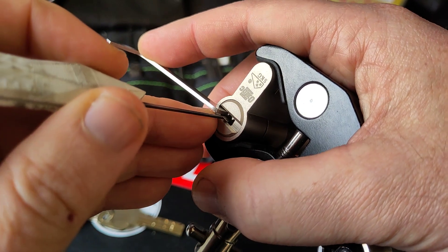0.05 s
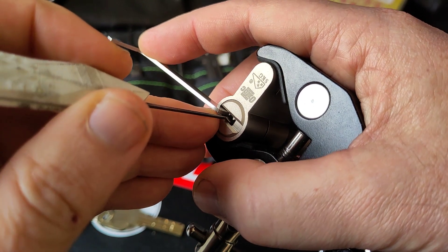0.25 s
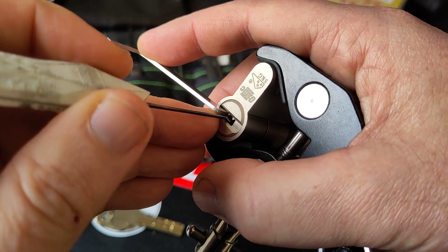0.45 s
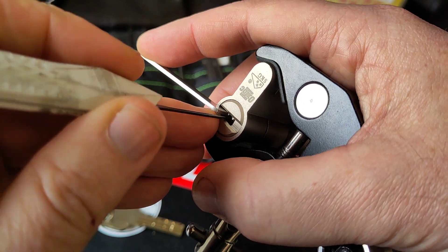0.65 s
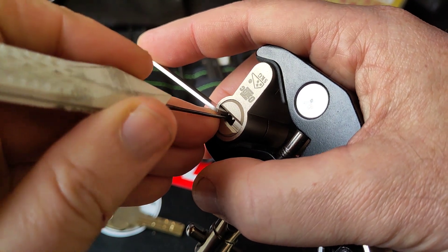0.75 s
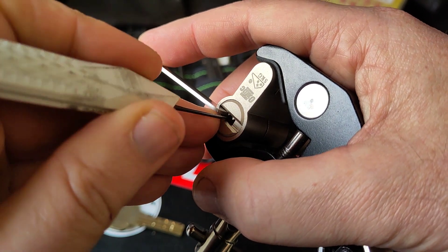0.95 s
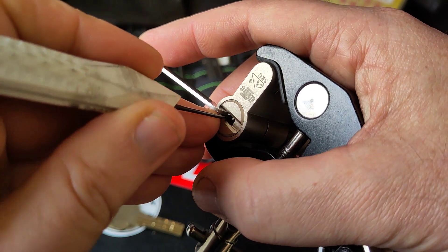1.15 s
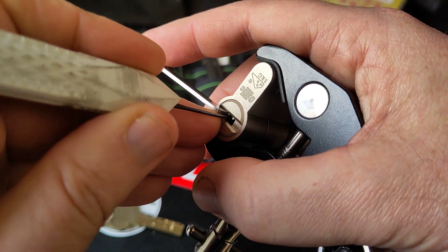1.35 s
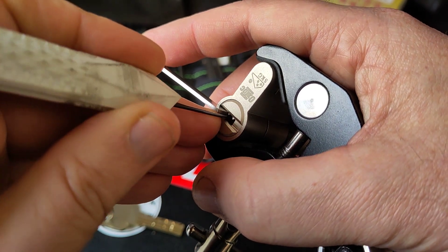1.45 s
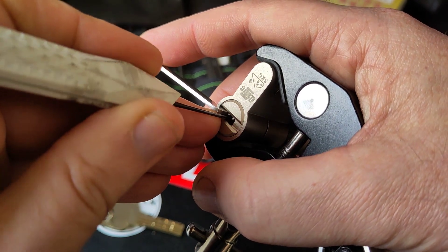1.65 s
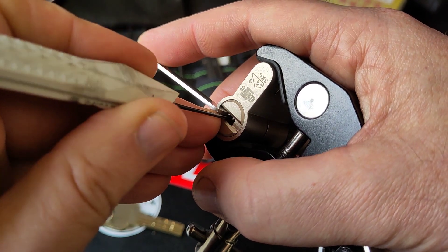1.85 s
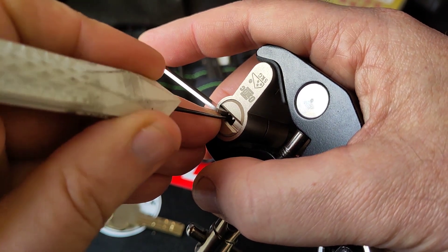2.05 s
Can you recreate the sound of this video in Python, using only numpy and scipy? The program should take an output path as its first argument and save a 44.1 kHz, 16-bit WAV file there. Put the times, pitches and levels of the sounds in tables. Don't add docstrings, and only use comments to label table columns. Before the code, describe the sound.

Lock picking, close and dry: a faint tick at 0.1 seconds, crisp small clicks at 0.37, 0.65 and 0.83 with thin scrapes between. At 0.98 a pin sets with a loud bright snap, quick bounces and a low table thump. Lighter ticks follow at 1.34, 1.49, 1.57 and 1.72, two with soft thumps. Hiss, low hand rumble, air sway and a faint left-side fan continue; short room tail.

```python
import sys
import numpy as np
from scipy import signal
from scipy.fft import rfft, irfft
from scipy.io import wavfile
from scipy.ndimage import uniform_filter1d

SR = 44100
rng = np.random.default_rng(int(sys.argv[2]) if len(sys.argv) > 2 else 0)


def dump_mix(stems):
    frames = np.atleast_2d(stems).T
    limited = np.clip(frames, -1, 1)
    pcm = np.round(limited * 32767).astype(np.int16)
    wavfile.write(sys.argv[1], SR, pcm)


def voltage_ratio(decibels):
    exponent = np.asarray(decibels, float) / 20
    return 10 ** exponent


N = 92610
HISS_TOP_HZ = 15650

# start_s, sway_db, rumble_db
AIR_AND_HANDS = [(0.0, -78, 6), (0.439, -39, -2), (0.51, -51, 3.5), (0.62, -36, 5), (0.83, -45, 6),
                 (0.89, -64.5, 3.5), (1.09, -37.5, 5.5), (1.232, -33.5, 3), (1.32, -61, 2),
                 (1.81, -40.5, 1), (2.04, -76, 2), (2.1, -54, 2)]


def ring(x, hz, t60):
    pole = np.exp(2j * np.pi * hz / SR - np.log(1000) / (t60 * SR))
    return signal.lfilter([1], [1, -pole], x).imag


def late(x, s):
    k = int(s * SR)
    return np.concatenate([np.zeros(k), x[:N - k]])


def walk(rate):
    k = int(SR / rate)
    steps = np.repeat(rng.standard_normal(N // k + 1), k)
    return 1.11 * uniform_filter1d(uniform_filter1d(steps, k), k)[:N]


def follow(start_s, level_db):
    return voltage_ratio(np.interp(np.arange(N) / SR, start_s, level_db))


def noise(spectrum):
    flicker_db = 1.1
    patch_db, patch_hz, patch_per_s, patch_full_hz = 4.0, 350, 20, 6500
    f = np.arange(N // 2 + 1) * SR / N + .1
    hz, db = np.array(spectrum, float).T
    level = voltage_ratio(np.interp(np.log(f), np.log(hz), db))
    x = rfft(rng.standard_normal(N)) * level * np.sqrt(SR / 2)
    x = x * (f > hz[0] / 2) * (f < HISS_TOP_HZ)
    strip = np.maximum(f // patch_hz - 1, 0)
    out = irfft(x * (strip == 0), N) * voltage_ratio(flicker_db * walk(11))
    top = 1.05 * hz[-1]
    x[f > top] = 0
    for k in range(1, int(top // patch_hz) + 1):
        depth_db = patch_db * min(k * patch_hz / patch_full_hz, 1)
        out += irfft(x * (strip == k), N) * voltage_ratio(depth_db * walk(patch_per_s))
    return out


def sway():
    sway_hz, side_db = 4.4, -14.5
    start_s, sway_db, _ = np.array(AIR_AND_HANDS).T
    cycles = np.cumsum(sway_hz * (1 + 0.162 * walk(3.75))) / SR
    mid = np.sqrt(2) * np.sin(2 * np.pi * cycles)
    side = voltage_ratio(side_db) * np.array([[1], [-1]]) * walk(11.24)
    return follow(start_s, sway_db) * (mid + side)


def rumble():
    # pitch_hz, level_db (per Hz)
    spectrum = [(8, -82.5), (20, -72.5), (40, -86), (80, -91.5), (160, -95), (300, -100), (600, -110),
                (1500, -125)]
    start_s, _, rumble_db = np.array(AIR_AND_HANDS).T
    return noise(spectrum) * follow(start_s, rumble_db)


def hiss():
    # pitch_hz, level_db (per Hz)
    left = [(8, -67.5), (40, -77), (150, -93.5), (500, -103), (1200, -103), (3500, -110), (9000, -116),
            (15000, -111)]
    # pitch_hz, level_db (per Hz)
    right = [(8, -68.5), (40, -96.5), (150, -92), (500, -103), (1500, -106), (5000, -111), (10000, -117),
             (15000, -111)]
    return np.array([noise(left), noise(right)])


def fan():
    fan_hz, width_hz, level_db = 1937, 930, -70
    t60 = 2.4 / width_hz
    x = ring(ring(rng.standard_normal(N), fan_hz, t60), fan_hz, t60)
    return x / x.std() * voltage_ratio(level_db + 1.4 * walk(3.65)) * voltage_ratio(np.array([[0], [-14]]))


def stir():
    # start_s, level_db
    swell = [(0, 2.5), (.12, 0), (.34, -1), (0.421, 2.5), (.62, 1), (.75, 3), (.9, 1.5), (1.04, 2),
             (1.3, 0.5), (1.5, -1), (1.6, -1.5), (1.72, 1.5), (2.1, -0.5)]
    return follow(*np.array(swell).T)


def room(x):
    gap_s, t60_s = 0.00062, .23
    tail_db = [-15.5, -24.5]
    t = np.arange(SR // 3) / SR
    fade = np.exp(-np.log(1000) * t / t60_s) * np.clip(t / gap_s, 0, 1)
    tail = rng.standard_normal((2, len(t))) * fade
    tail = tail / np.sqrt((tail ** 2).sum(axis=1, keepdims=True))
    tail = tail * voltage_ratio(np.array(tail_db))[:, None]
    return signal.fftconvolve(x, tail, axes=1)[:, :N]


def table_top():
    push_s, right_db, right_lag_s = 0.0012, -3.0, .0003
    # start_s, level_db
    thumps = [
        (.9794, -42),
        (1.730, -62),
        (1.489, -57),
    ]
    # pitch_hz, level_db, t60_s
    modes = [(53.6, -3.5, 0.21), (107, -6.5, 0.049), (170.3, -2.5, 0.19), (236.5, 0.5, 0.17),
             (280.7, -8, 0.16), (365, -7.5, 0.1), (460, -11, 0.049), (566, -4, 0.038), (735, -3.5, 0.023),
             (866, 2, 0.03), (1060, 0.5, 0.029)]
    x = np.zeros(N)
    for start_s, db in thumps:
        x[int(start_s * SR)] = voltage_ratio(db)
    push = np.hanning(int(push_s * SR) + 3)
    x = np.convolve(x, push / push.sum())[:N]
    thump = sum((-1) ** k * voltage_ratio(db) * ring(x, hz, t60) for k, (hz, db, t60) in enumerate(modes))
    return np.array([thump, voltage_ratio(right_db) * late(thump, right_lag_s)])


def brief_tones():
    rise_s = .0004
    # start_s, pitch_hz, left_db, right_db
    short_tones = [(.3652, 4000, -53, -48), (.3655, 7000, -70, -51), (.3668, 6000, -62, -52),
                   (.3665, 9100, -43, -58), (.3662, 14800, -60, -54), (.3735, 10000, -56, -75),
                   (.6472, 2900, -59, -64), (.6474, 5500, -62, -59), (.8282, 5500, -54, -59),
                   (.8280, 7000, -51, -52), (.9705, 7000, -58, -50), (.9740, 7200, -56, -48),
                   (.9805, 5000, -50, -44), (.9797, 14800, -50, -40), (.9825, 13000, -50, -46),
                   (.9880, 7300, -60, -50), (1.0010, 5500, -72, -52), (1.0012, 7200, -72, -53),
                   (1.0008, 14500, -62, -50), (.3660, 3200, -57, -56), (.8335, 5000, -59, -62),
                   (1.4900, 900, -52, -56), (.9800, 1400, -44, -54), (.9803, 2500, -45, -52),
                   (.9798, 3600, -41, -50), (.9800, 5800, -43, -46), (.9797, 16000, -34, -44),
                   (.6472, 16000, -50, -58), (1.4893, 2500, -60, -66)]
    out, u = np.zeros((2, N)), np.arange(SR // 100) / SR
    swell = u / rise_s * np.exp(1 - u / rise_s)
    for start_s, hz, left_db, right_db in short_tones:
        tone = swell * np.sin(2 * np.pi * (hz * u + rng.random((2, 1))))
        k = int((start_s - rise_s) * SR)
        out[:, k:k + len(u)] += voltage_ratio(np.array([[left_db], [right_db]])) * tone
    return out


def slide():
    # start_s, length_s, level_db
    scrapes = [(.004, 0.01, -64.5), (0.067, 0.03, -76), (0.363, 0.016, -66), (0.672, 0.058, -73.5),
               (.8235, .040, -62), (.968, .010, -56), (0.939, 0.051, -70), (0.988, 0.0071, -62.5)]
    t = np.arange(N) / SR
    return sum(voltage_ratio(db) * np.sin(np.pi * np.clip((t - s) / d, 0, 1) ** 0.65) for s, d, db in scrapes)


def highpass(x, hz):
    return signal.sosfilt(signal.butter(2, hz, "high", fs=SR, output="sos"), x)


def lock():
    grit_per_s, grit_scatter_db = 3000, 2.5
    mode_scatter_db, right_lag_s = 2.0, .0004
    body_low_hz, skirt = 700, 1.12
    crack_db, crack_room_db, crack_low_hz = -3.5, 1, 4500
    # start_s, low_db, middle_db, high_db, body_db
    pin_ticks = [(.1020, -58, -66, -70, -78), (.3651, -58, -42, -46, -56), (.3661, -58, -45, -46, -57),
                 (.3690, -64, -53, -58, -68), (.6470, -37, -54, -33, -56), (.6490, -56, -62, -56, -66),
                 (.6955, -55, -66, -70, -80), (.7635, -56, -62, -70, -78), (.8250, -48, -54, -68, -74),
                 (.8279, -39, -46, -66, -64), (.8311, -49, -54, -68, -74), (.9726, -36, -43, -58, -64),
                 (.9785, -38, -30, -36, -52), (.9790, -28, -13.5, -27, -33), (.9801, -35, -26, -33, -44),
                 (.9822, -48, -44, -42, -46), (1.0005, -52, -50, -52, -70), (1.3370, -40, -47, -54, -62),
                 (1.3401, -58, -62, -64, -76), (1.4891, -50, -55, -56, -55), (1.5680, -59, -66, -68, -72),
                 (1.7226, -50, -46, -58, -59)]
    # pitch_hz, level_db, t60_s
    clusters = [
        [(7300, -12, .007), (7950, -8, .008), (8600, 0, .006), (9200, -5, .005)],
        [(10300, -2, .0035), (11100, -2, .0035), (11800, 0, .0045), (12600, -6, .0035)],
        [(13600, -6, .005), (14600, 0, .006), (15500, -3, .004)],
        [(1400, -1, .0022), (2100, 0, .002), (2900, 0, .002), (3800, 1, .002), (4900, -4, .002),
         (6000, 0, .0022)],
    ]
    # low_db, middle_db, high_db, body_db
    scrape_colour = [0, -4, -14, -13]
    # pitch_hz, level_db
    shadow = [(1500, -7), (3800, -7), (5000, -2), (7300, -1), (8100, -17), (10500, -19), (12000, -27),
              (15000, -14)]
    # low_db, middle_db, high_db, body_db
    spill_db = [
        [-2, -6, -2.2, -2.5],
        [-1, -8, 0, 4],
    ]

    ticks = np.array(pin_ticks)
    at = (ticks[:, 0] * SR).astype(int)
    scatter_db = mode_scatter_db * rng.standard_normal((len(ticks), 2, 17))
    shadow_hz, shadow_db = np.array(shadow).T
    stroke = slide()
    near, spill, k = 0, 0, 0
    for c, cluster in enumerate(clusters):
        part = np.zeros((2, N))
        for hz, db, t60 in cluster:
            grit = rng.random(N) < grit_per_s / SR
            grit = grit * voltage_ratio(grit_scatter_db * rng.exponential(size=N))
            for side in range(2):
                x = grit * stroke * voltage_ratio(scrape_colour[c])
                np.add.at(x, at, voltage_ratio(ticks[:, 1 + c] + scatter_db[:, side, k]))
                shade_db = side * np.interp(np.log(hz), np.log(shadow_hz), shadow_db)
                part[side] += (-1) ** k * voltage_ratio(db + shade_db) * ring(x, hz, t60)
            k += 1
        low_hz = body_low_hz if c == 3 else cluster[0][0] / skirt
        band = [low_hz, cluster[-1][0] * skirt]
        part = signal.sosfilt(signal.butter(2, band, "band", fs=SR, output="sos"), part)
        near = near + part
        spill = spill + voltage_ratio(np.array(spill_db)[:, c, None]) * (part[0] + 2 * part[1])
    crack = np.zeros(N)
    crack[at] = voltage_ratio(ticks[:, 1:4].max(axis=1))
    crack = highpass(crack, crack_low_hz)
    near[0] += voltage_ratio(crack_db) * crack
    spill = spill + voltage_ratio(crack_room_db) * crack
    return np.array([near[0], late(near[1], right_lag_s)]), spill


def scene():
    floor = rumble() + (hiss() + fan()) * stir() + sway()
    near, spill = lock()
    return near + brief_tones() + table_top() + room(spill) + floor


def top_cut(x):
    return signal.sosfilt(signal.butter(12, 16830, fs=SR, output="sos"), x)


def record(dry):
    shelf_db, top_hz = -14, 16650
    f = np.arange(N // 2 + 1) * SR / N
    corner_hz = [HISS_TOP_HZ - 100, HISS_TOP_HZ + 100, top_hz, top_hz + 150]
    top_db = np.interp(f, corner_hz, [0, shelf_db, shelf_db, -80])
    mix = irfft(rfft(dry, axis=1) * voltage_ratio(top_db), N, axis=1)
    return top_cut(mix)


dry = scene()
out = record(dry)
dump_mix(out)
```